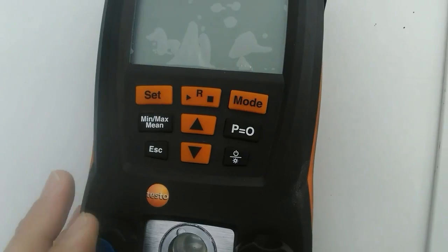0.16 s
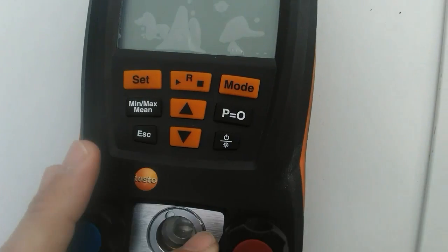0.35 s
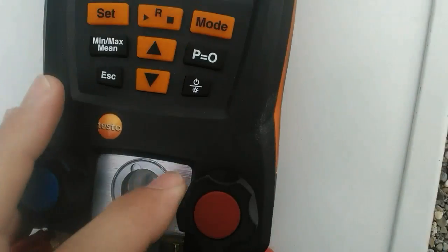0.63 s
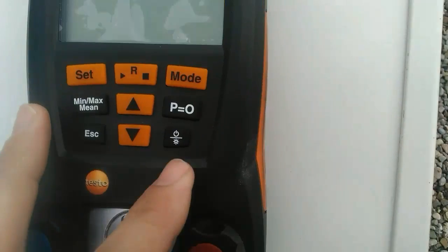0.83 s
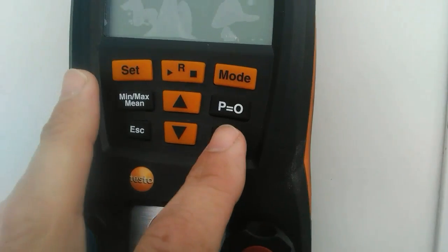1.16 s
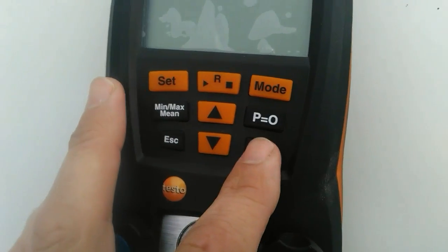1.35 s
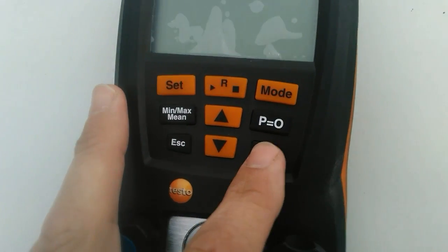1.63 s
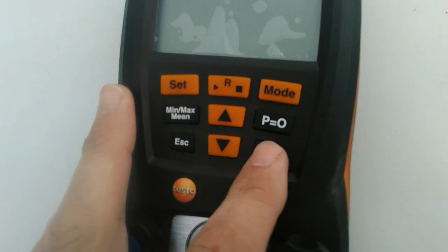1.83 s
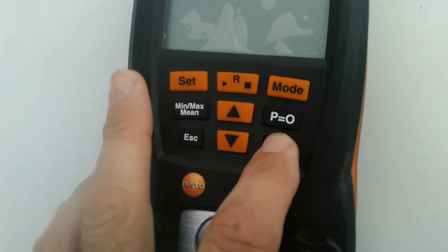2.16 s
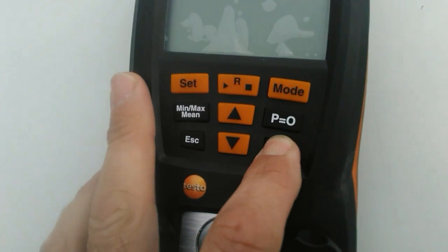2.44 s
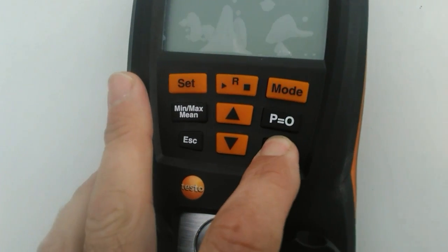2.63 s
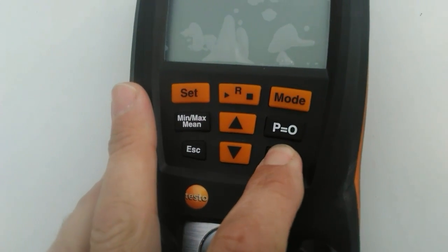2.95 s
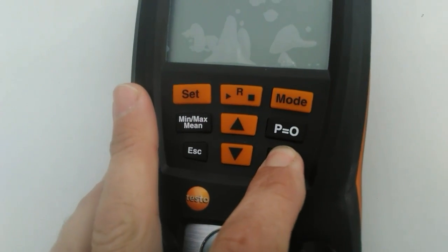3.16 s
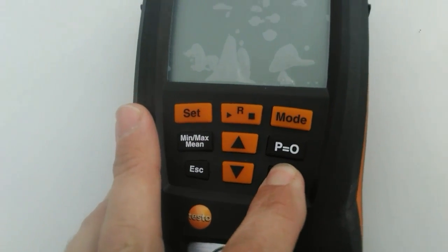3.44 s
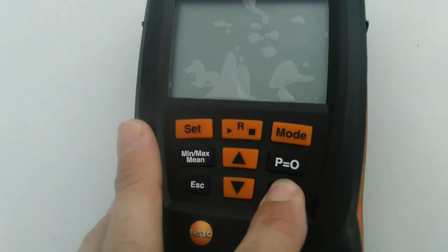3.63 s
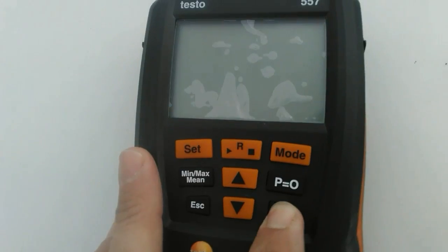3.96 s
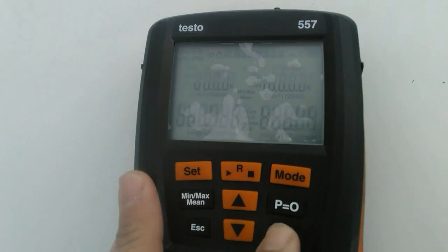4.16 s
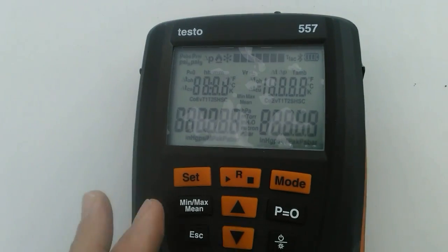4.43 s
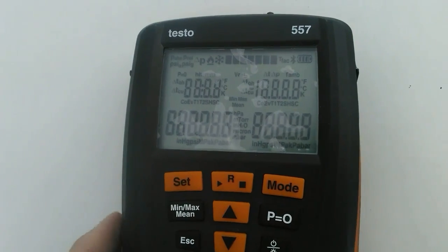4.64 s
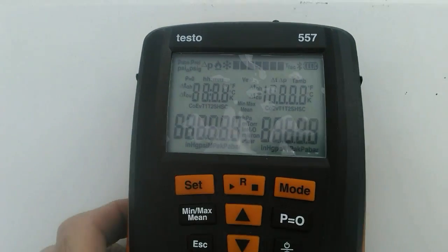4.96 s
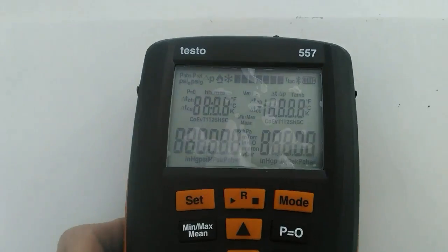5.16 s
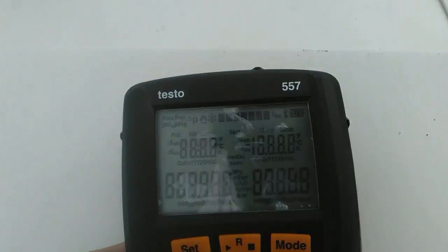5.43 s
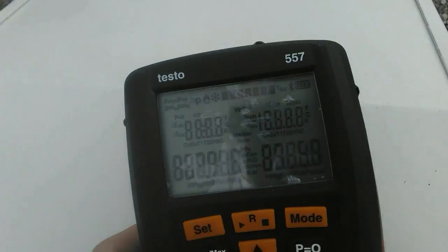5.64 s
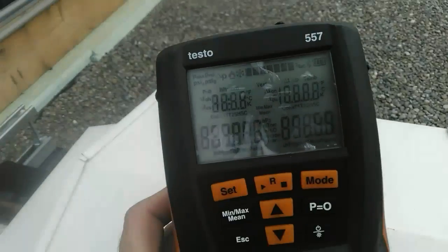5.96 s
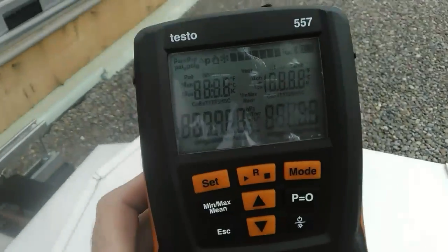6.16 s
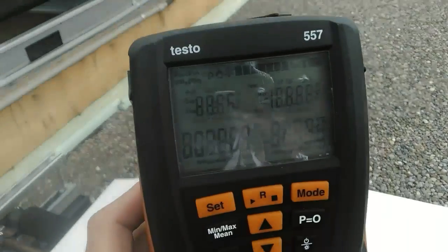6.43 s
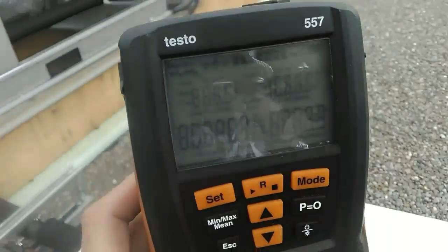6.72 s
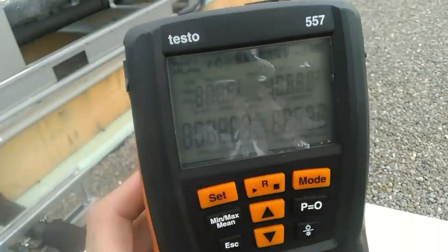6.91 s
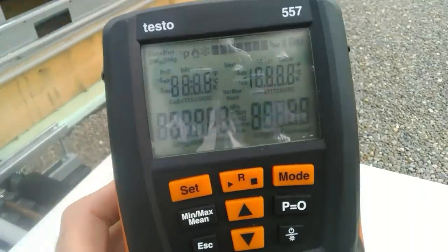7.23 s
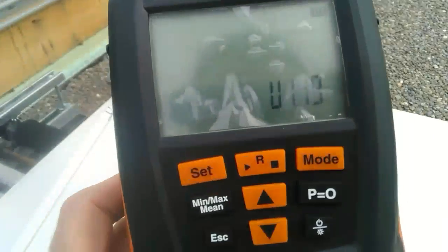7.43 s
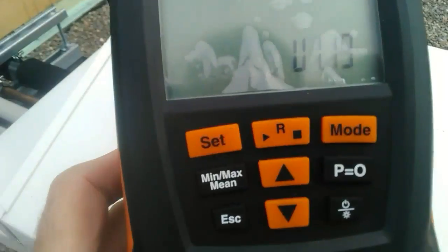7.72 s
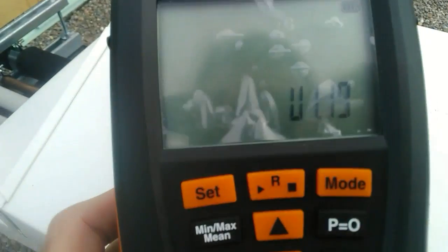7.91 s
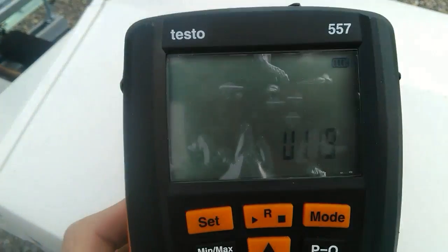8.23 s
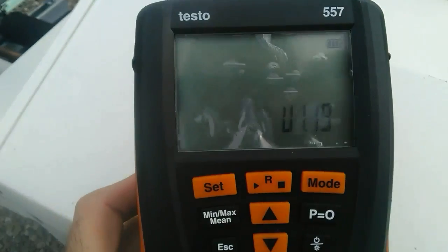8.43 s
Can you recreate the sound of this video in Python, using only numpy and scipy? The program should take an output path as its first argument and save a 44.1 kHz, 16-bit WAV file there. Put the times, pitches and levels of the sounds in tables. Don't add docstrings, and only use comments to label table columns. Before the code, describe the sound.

A compressor and fan drone continuously in the open air, close to a handheld microphone of coarse quality that adds a buzzy, metallic treble. At 0 seconds the hum is faint, dips slightly, then rises from about 0.7 to 3 seconds as the gain opens. Low tones beat and throb under rumbling air, a middle-pitched roar and grainy rush. Small dull bumps come around 1 second, a stronger low thud at 1.8, smaller knocks near 2.05, 2.8 and 3.3. At 3.8 the sound cuts to complete silence for about 0.14 seconds, returning with a heavy low thump. The full hum continues, with a soft bump near 6. From about 6.3 the booming middle tones weaken, leaving low hum, more coil hiss and a faint thin whine; a short tap falls at 6.7. Wind puffs flutter softly throughout, and the boom partly returns as the drone stops abruptly around 8.6.

```python
import sys
import numpy as np
from scipy import signal
from scipy.io import wavfile
from scipy.ndimage import uniform_filter1d

SR = 44100
rng = np.random.default_rng(int(sys.argv[2]) if len(sys.argv) > 2 else 0)


def digitize_waveform(pressure):
    field = np.atleast_2d(pressure).T
    bounded = np.clip(field, -1, 1)
    quanta = np.round(bounded * 32767).astype(np.int16)
    wavfile.write(sys.argv[1], SR, quanta)


def gain_from_decibels(decibels):
    exponent = np.asarray(decibels, float) / 20
    return 10 ** exponent


N = 378378
T = np.arange(N) / SR
TICKS = T[::128]

SHAFT_HZ, BLADE_HZ, MAINS_HZ = 29.374, 77.39, 60.0
STROKE_S, BLADE_S = .00095, -.0008
CABINET_HZ, CABINET_WIDTH_HZ = 165, 30
DROPOUT_START_S, DROPOUT_END_S = 3.812, 3.9513
SLIP_S = .0696
CLOCK = T - SLIP_S * (T > DROPOUT_START_S)

# [multiple of the shaft rate, level/dB]
CABINET_TONES = [(2, -10.5), (3, -18.5), (4, 0), (6, -5.5)]
PANEL_TONES = [(8, -15.5), (9, 0.0), (10, -19.5)]
# [multiple of the blade rate, level/dB]
FAN_TONES = [(1, -17.5), (2, 0), (3, -41.5), (4, -18), (5, -23)]
# [multiple of the shaft rate, level/dB]
BRACKET_TONES = [(21, -15.5), (22, -9.5), (24, -11.5), (25, -12.5)]
# [multiple of the shaft rate, level/dB]
ROCKING_TONES = [(-2, -10), (2, -19), (4, -10.5), (5, -11), (10, -15)]
# [t/s, level/dB, length/s]
SWAY = [
    (.2, 0, .3),
    (2.7, -1.5, 0.24),
    (4.5, -0.5, 0.16),
    (5.0, -1, 0.12),
    (5.46, 2, .1),
    (6.9, -2, 0.45),
    (7.26, 4, 0.086),
    (7.56, -2, 0.09),
    (7.95, 3.5, 0.16),
    (8.55, 3, 0.087),
]
# [t/s, level/dB, length/s]
SINGING = [(.25, -5, .3), (1.7, 5, .3), (2.7, 3, 0.14), (3.3, 8, 0.044), (3.65, -4, .15), (4.05, 4.5, .1),
           (5.3, 6.5, 0.16), (6.1, 8, 0.19), (6.66, 2, 0.11), (6.96, 3, 0.078), (7.26, -5, .08),
           (7.65, 9, 0.22), (8.4, 9, .1)]
# [t/s, level/dB, length/s]
SURGES = [(.48, 2, 0.056), (.9, 3, 0.077), (1.6, 1.5, .05), (1.72, 2, 0.048), (1.85, 0.5, 0.063),
          (2.05, 0, 0.054), (2.28, -3, 0.067), (2.85, 2, .1), (3.05, -3, 0.045), (3.35, 3, 0.059),
          (3.7, 3, .1), (3.98, 3, 0.07), (4.15, -2, 0.18), (4.65, -0.5, 0.11), (4.92, 2, 0.046),
          (5.08, 0, 0.067), (5.6, 2.5, 0.11), (5.99, -4.5, 0.029), (6.07, 2, 0.044), (6.15, 1.5, 0.085),
          (6.21, 3, .025), (6.27, -1.5, 0.038), (7.0, -4, 0.081), (7.45, 1.5, 0.049), (7.62, -4, .06),
          (7.8, 3, 0.13), (7.97, -4, 0.082), (8.12, 4.5, 0.051), (8.3, -1, 0.2), (8.55, 3, .06)]
# [f/Hz, level/dB]
RUMBLE_COLOUR = [(85, -42), (110, -1), (155, -0.5), (200, -3.5), (250, -6.5), (330, -38)]
ROAR_COLOUR = [(200, -7), (270, -0.5), (310, 6), (340, 1.5), (385, 2.5), (450, -1.5), (520, -4.5),
               (620, -50)]
HISS_COLOUR = [(600, -19), (850, 0.5), (1200, -1), (1500, -3.5), (2000, -4.5), (2300, -12.5), (2700, -25)]
FIZZ_COLOUR = [(1900, -16.5), (2300, 4.5), (2700, 1), (3200, -4.5), (3600, -8.5), (4000, -39)]
# [f/Hz, level/dB]
RUSH_COLOUR = [(420, -7.5), (540, -0.5), (640, 1), (720, -1), (800, -2.5), (880, -5), (1080, -24)]
# [t/s, level/dB, length/s]
EDDIES = [(.6, 8, 0.034), (1.0, 2, 0.025), (1.25, -2, 0.059), (1.44, -1.5, 0.024), (1.63, 4, 0.067),
          (1.8, 10, 0.015), (1.95, -2.5, 0.059), (2.05, 9.5, 0.015), (2.4, -1, 0.21), (2.75, 1, 0.033),
          (3.0, -0.5, 0.027), (3.08, -5, 0.017), (3.27, 3, .06), (3.46, 1, 0.069), (3.64, 6, .03),
          (3.79, 10, 0.017), (4.0, 6, 0.059), (4.19, 0, 0.013), (4.3, 2.1, 0.1), (4.8, 0, .05),
          (5.08, 6, 0.019), (5.5, 4, 0.033), (6.3, 5, 0.045), (6.57, -1.5, .03), (7.16, 5, 0.021),
          (7.3, 4.5, 0.036), (7.59, 2, 0.024), (7.71, 8, 0.023), (7.97, -4, 0.066), (8.4, -3, 0.36)]
# [t/s, peak level/dB, ring f/Hz, time to
# fall 60 dB/s]
TAPS = [(.59, -27.5, 700, .06), (0.987, -14.5, 398, 0.14), (1.022, -19.5, 462, 0.1),
        (1.118, -20.5, 401, 0.2), (1.575, -33, 680, 0.027), (1.804, -4, 190, 0.054), (2.04, -13, 167, 0.1),
        (2.074, -13, 202, 0.063), (2.816, -16, 750, 0.041), (3.262, -12, 746, 0.026),
        (3.951, -2.5, 123, 0.12), (4.197, -25, 795, .03), (5.845, -28.5, 645, 0.034),
        (6.026, -11, 156, 0.65), (6.691, -8, 926, 0.025)]
# [f/Hz, level/dB]
WIND_COLOUR = [(20, -21), (40, -22), (55, 1.5), (80, 8), (100, 6), (125, -9)]
# [t/s, level/dB, length/s]
GUSTS = [(.3, 8, 0.11), (.62, 11.5, 0.093), (1.0, 18, 0.075), (1.45, 3, .08), (1.72, 4, 0.11),
         (2.2, 8, 0.14), (2.6, 0, 0.087), (2.8, -12, 0.023), (3.1, 9, 0.084), (3.38, -4, 0.07),
         (3.7, -1, 0.078), (4.15, -2, .06), (4.4, 1.5, .15), (4.76, 5, 0.053), (4.96, 6, 0.071),
         (5.4, 2, 0.037), (5.6, 0, 0.12), (5.8, 3, .1), (6.15, 3.5, 0.24), (6.58, 2, 0.09),
         (6.8, -4, 0.055), (7.2, 10, 0.038), (7.46, 5, .08), (7.96, 12.5, 0.16), (8.34, 2, 0.1),
         (8.55, 3, 0.096)]
# [t/s, automatic gain level/dB, shading of the panel 0-1, view of the coil 0-1]
CAMERA = [(0.0, -16, 0, 0.7), (0.15, -18, 0, 0.02), (0.7, -14, 0, 0), (1.0, -9.5, 0.03, 0),
          (1.35, -6.5, 0.07, 0.02), (1.75, -5, 0, 0.18), (2.3, -3.5, 0.15, 0.01), (2.9, -1, 0.27, 0.13),
          (3.8, 0, 0.16, 0.06), (4.5, 0.5, 0, 0.32), (5.1, 0.5, 0.23, 0.24), (5.7, 0, 0.29, 0.64),
          (6.05, -1, 0.41, 0.74), (6.35, -0.5, 0.94, 1), (6.8, -0.5, 1, .8), (7.4, -1.5, 0.82, 0.7),
          (7.9, -1, 0.75, 0.9), (8.57, 0, 0.42, 0.67)]


def machine():
    beats = fifth_stroke() + fan()
    return cabinet(beats) + beats + panel() + motor() + bracket() + valve()


def fifth_stroke():
    return heard(-24.5, shade_db=1.5, view_db=0.3, surge=1.1) * stroke(5, 0, waver_db=0)


def fan():
    blades = sum(tone(k * BLADE_HZ, db, BLADE_S, waver_db=1.53) for k, db in FAN_TONES)
    return heard(-22, shade_db=-1.5, view_db=0.1, surge=1.0) * blades


def cabinet(beats):
    strokes = sum(stroke(k, db) for k, db in CABINET_TONES)
    return heard(-25.0, shade_db=0, view_db=0.2, surge=1.0) * strokes * beat_swell(beats, 0.14)


def panel():
    strokes = sum(stroke(k, db, waver_db=1.5) for k, db in PANEL_TONES)
    return heard(-21.0, shade_db=-9.5, view_db=0.45) * strokes


def motor():
    pull_hz = 6 * MAINS_HZ
    wobble_hz = BLADE_HZ / 4
    pull = tone(pull_hz, 0, waver_db=1.1) + tone(2 * pull_hz, -32)
    pull += tone(pull_hz - wobble_hz, -28.5) + tone(pull_hz + wobble_hz, -12.0)
    return heard(-23.0, shade_db=-9, view_db=-5.9, own=SWAY) * pull


def bracket():
    buzz = sum(tone(k * SHAFT_HZ, db, rng.random(), waver_db=2.5) for k, db in BRACKET_TONES)
    buzz += sum(tone(6 * MAINS_HZ + k * SHAFT_HZ, db, rng.random(), waver_db=4.5)
                for k, db in ROCKING_TONES)
    return heard(-33, shade_db=-9, view_db=1.5, eddy=.4, lumpy_db=3, gated=0.16) * buzz


def valve():
    level = heard(-53, shade_db=0, view_db=7, lumpy_db=1.5, own=SINGING)
    broken = np.interp(T, TICKS, gain_from_decibels(3.2 * drift(45, low_hz=12)))
    return level * broken * tone(47 * SHAFT_HZ, 0, waver_db=3.5)


def stroke(multiple, db, waver_db=1.56):
    hz = multiple * SHAFT_HZ
    lag = np.pi + np.arctan(2 * (hz - CABINET_HZ) / CABINET_WIDTH_HZ)
    return tone(hz, db, STROKE_S + lag / (2 * np.pi * hz), waver_db)


def airflow(throb):
    rumble = heard(-25, shade_db=-2.1, view_db=-0.2, surge=0.44, gust=0.39, lumpy_db=-1.5, gated=.05)
    rumble *= beat_swell(throb, 0.29) * turbulence(RUMBLE_COLOUR, patchy_db=-0.5, flicker_db=-0.5, size=2048)
    roar = heard(-28.5, shade_db=-4, view_db=-0.1, gust=0.192, eddy=0.28, lumpy_db=1.95, gated=.1)
    roar *= beat_swell(throb, 0.08) * turbulence(ROAR_COLOUR, patchy_db=2.5, flicker_db=1.05, size=2048)
    hiss = heard(-38.5, shade_db=-0.34, view_db=7.5, eddy=0.17, lumpy_db=1.11, gated=0.055)
    hiss *= beat_swell(throb, 0.0083) * turbulence(HISS_COLOUR, patchy_db=2.5, flicker_db=1.6, size=512)
    fizz = heard(-50, shade_db=2.9, view_db=7.5, eddy=0.29, lumpy_db=1.0)
    fizz *= turbulence(FIZZ_COLOUR, patchy_db=2.0, flicker_db=1.83, size=512)
    return rumble + roar + hiss + fizz


def guard():
    level = heard(-31.5, shade_db=-5.5, view_db=2.7, eddy=0.84, lumpy_db=0.7, gated=0.25)
    return level * turbulence(RUSH_COLOUR, patchy_db=2.5, flicker_db=2.33, size=1024)


def handling():
    out, t = np.zeros(N), np.arange(5000) / SR
    for start_s, db, hz, fall_s in TAPS:
        ring = np.sin(2 * np.pi * hz * t)
        soft_start = 1 - np.exp(-t * hz * 0.64)
        out[round(start_s * SR):][:len(t)] += gain_from_decibels(db - 60 * t / fall_s) * soft_start * ring
    return out


def wind(throb):
    level = heard(-33.5, shade_db=-4.5, surge=.1, gust=1.01, lumpy_db=0.0)
    buffeting = turbulence(WIND_COLOUR, patchy_db=-0.7, flicker_db=-0.5, size=4096)
    return beat_swell(throb, 0.14) * level * buffeting


def tone(hz, db, start_s=0, waver_db=1.2):
    strength = np.sqrt(2) * gain_from_decibels(db + waver_db * drift(6))
    return np.interp(T, TICKS, strength) * np.cos(2 * np.pi * hz * (CLOCK - start_s))


def turbulence(colour, patchy_db, flicker_db, size):
    frames, hz = 4 * N // size + 5, np.fft.rfftfreq(size, 1 / SR)
    real, imag, patches = rng.standard_normal((frames, len(hz), 3)).T
    patches = uniform_filter1d(patches, size=5, axis=0)
    patches = evened(uniform_filter1d(patches, size=7, axis=1))
    flicker = evened(uniform_filter1d(rng.standard_normal(frames), size=3))
    f, db = np.transpose(colour)
    shape_db = np.interp(np.log(hz + 1), np.log(f), db, left=-90, right=-90)[:, None]
    spectrum = (real + 1j * imag) * gain_from_decibels(shape_db + patchy_db * patches + flicker_db * flicker)
    return evened(signal.istft(spectrum, nperseg=size, noverlap=size * 3 // 4)[1][:N])


def beat_swell(hum, depth):
    quick = uniform_filter1d(uniform_filter1d(hum ** 2, size=1500), size=700)
    slow = uniform_filter1d(quick, size=11000)
    return (abs(quick) / (slow + 1e-12)) ** depth


def heard(db, shade_db=0, view_db=0, surge=0, gust=0, eddy=0, lumpy_db=0, gated=0, own=()):
    s, *columns = np.transpose(CAMERA)
    gain_db, shade, view = (np.interp(TICKS, s, c) for c in columns)
    moved_db = surge * swells(SURGES) + gust * swells(GUSTS) + eddy * swells(EDDIES) + swells(own)
    moved_db = moved_db + shade_db * shade + view_db * view + lumpy_db * drift(14, low_hz=3)
    return np.interp(T, TICKS, gain_from_decibels(db + (1 + gated) * gain_db + moved_db))


def swells(rows):
    return sum(db * np.exp(-.5 * ((TICKS - s) / length) ** 2) for s, db, length in rows)


def drift(top_hz, low_hz=0.2978):
    hz = np.geomspace(low_hz, top_hz, num=24)[:, None]
    waves = np.sin(2 * np.pi * (hz * TICKS + rng.random(hz.shape)))
    return evened((waves / np.sqrt(hz)).sum(0))


def evened(x):
    return x / np.sqrt(np.mean(x ** 2) + 1e-20)


def scene():
    hum = machine()
    band = signal.butter(2, (125, 180), "band", fs=SR, output="sos")
    throb = signal.sosfiltfilt(band, hum)
    return (hum + airflow(throb) + guard() + handling() + wind(throb))[None]


def roll_off(x):
    return signal.sosfilt(signal.butter(12, 16490, fs=SR, output="sos"), x)


def record(dry):
    rounded = np.tanh(dry)
    slow = signal.resample_poly(rounded, 80, 441, axis=1)
    held = slow[:, np.arange(N) * 80 // 441]
    outside_s = np.maximum(DROPOUT_START_S - T, T - DROPOUT_END_S)
    held = held * np.clip(outside_s / .0015, 0, 1)
    smooth = signal.oaconvolve(held, signal.firwin(31, 16500, fs=SR)[None], "same")
    edge = signal.firwin(1501, 15775, window=("kaiser", 9), fs=SR)
    mix = signal.oaconvolve(smooth, edge[None], "same")
    return roll_off(mix)


dry = scene()
out = record(dry)
digitize_waveform(out)
```